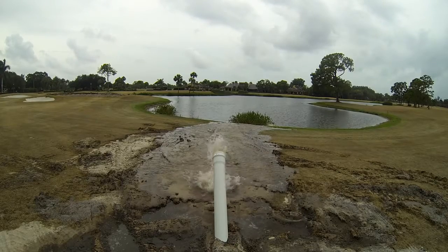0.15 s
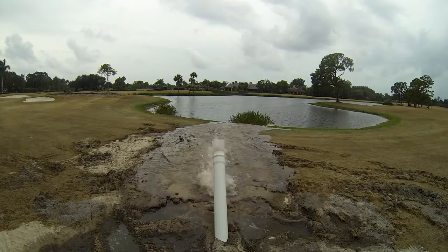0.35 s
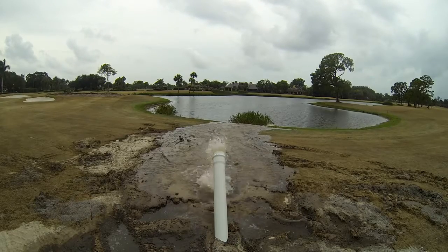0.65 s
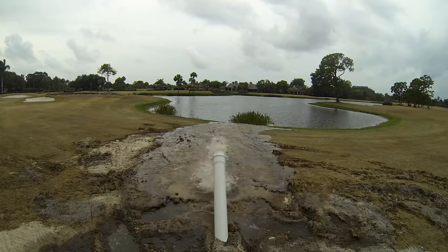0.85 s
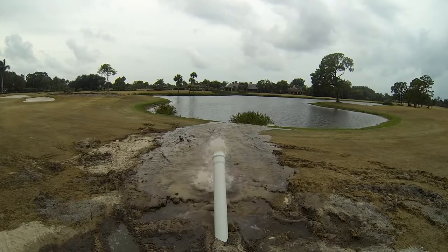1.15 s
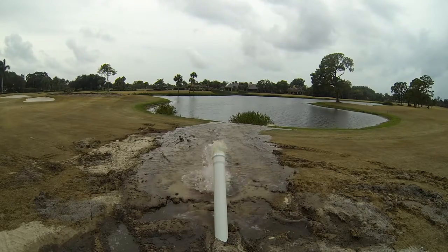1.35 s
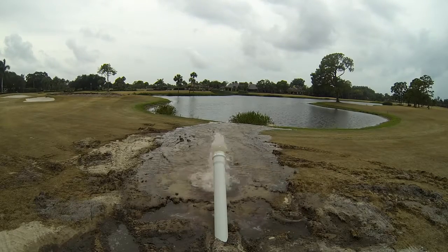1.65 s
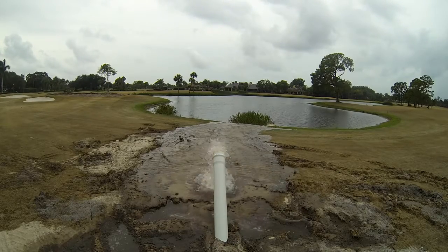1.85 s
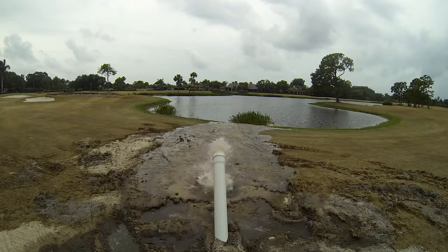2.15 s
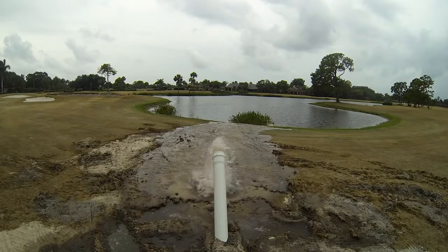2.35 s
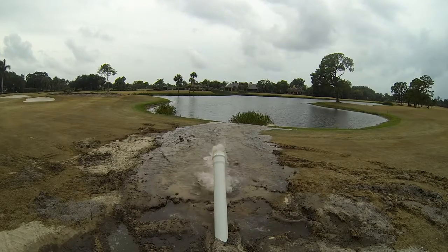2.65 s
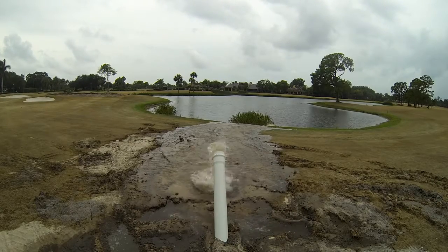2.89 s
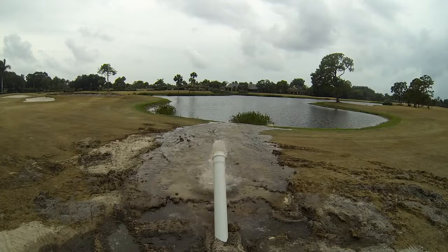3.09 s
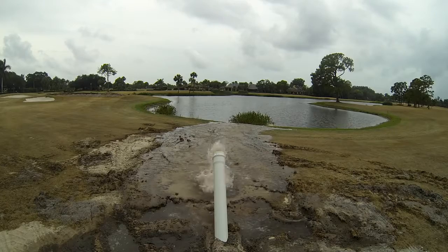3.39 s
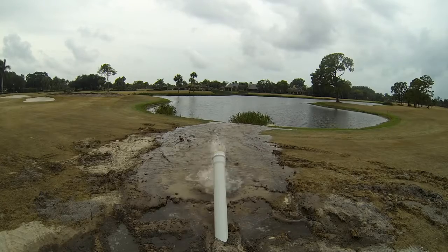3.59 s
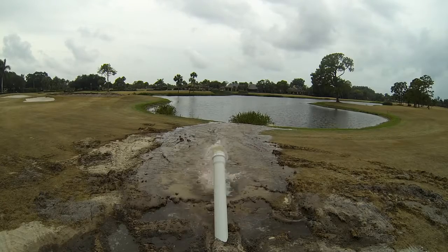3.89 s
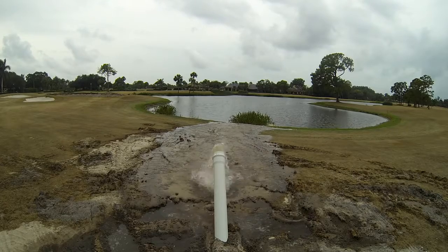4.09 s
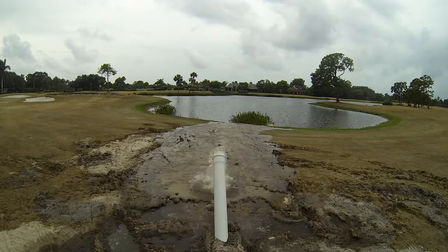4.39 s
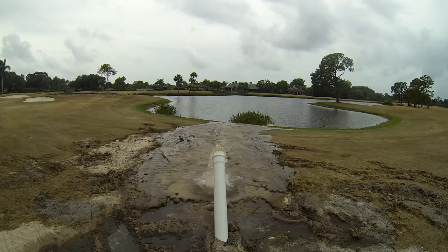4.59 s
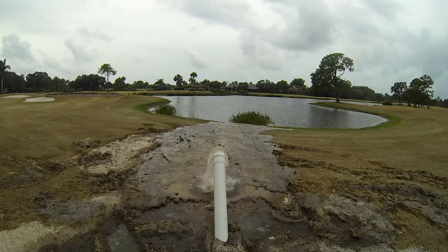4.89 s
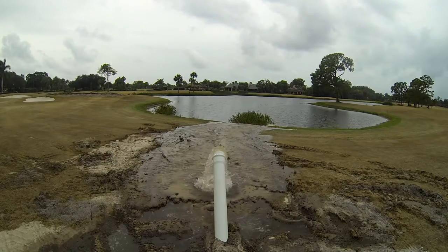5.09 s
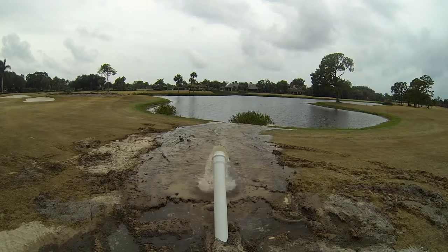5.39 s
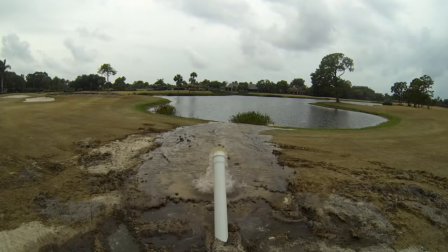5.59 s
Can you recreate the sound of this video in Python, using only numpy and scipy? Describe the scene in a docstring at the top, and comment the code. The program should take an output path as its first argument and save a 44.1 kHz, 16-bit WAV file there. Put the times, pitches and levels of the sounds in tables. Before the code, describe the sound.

Water is already gushing from an open pipe at 0 s, dropping in irregular slugs onto flooded ground, roughly five each second. Each has a bubbling low plunge, a dense mid-range splash and a thinner hiss of spray. A flat slap pops out near 0.7 s, with tiny high drips around it. Uneven pouring continues, with a stronger splash near 2.2 s. From about 2.5 to 3 s, hollow gulps of collapsing air appear; a crisp, prominent slap and bright drips follow at 3.2 s, then smaller slaps near 3.4 and 3.6 s. Deep gulps and slaps return around 4.0 and 4.3 s, with another gulp at 4.5 s. The stream thickens slightly towards a last slap near 5.4 s, then stops abruptly around 5.7 s. Underneath run soft runoff, a low pump hum, gentle wind thuds and a barely audible high electronic whine. Close, boxy camera microphone outdoors, without echo.

```python
"""First heard is a slug of water landing on flooded ground; more follow as water gushes from an open pipe.
Filtered bubbles and noise make each plunge, splash and spray; slaps, gulps and close drips stand out.
Behind them noise makes runoff and light wind on the microphone, and sines a pump humming through the pipe.
The camera's housing gives the water a hollow colour, held in the spectra; its electronics whine faintly."""
import sys
import numpy as np
from scipy.fft import rfft, irfft, next_fast_len
from scipy.io import wavfile
from scipy.ndimage import map_coordinates

SR = 44100
rng = np.random.default_rng(int(sys.argv[2]) if len(sys.argv) > 2 else 0)


def dump_mix(stems):
    """Bounce the given channels to the path in sys.argv[1] as a 16-bit WAV at rate SR."""
    frames = np.atleast_2d(stems).T  # one column per channel
    limited = np.clip(frames, -1, 1)  # hard clip at full scale
    pcm = np.round(limited * 32767).astype(np.int16)
    wavfile.write(sys.argv[1], SR, pcm)


N = 253134
TIME = np.arange(N) / SR  # s


def amp(db):
    """Decibels to gain."""
    return 10 ** (np.asarray(db) / 20)


def unit(x):
    """Scale to rms 1."""
    return x / np.sqrt(np.mean(x ** 2) + 1e-20)


def wobble(rate):
    """A smooth random curve through normal draws, rate knots a second."""
    knots = rng.standard_normal(int(N * rate / SR) + 4)
    return map_coordinates(knots, [TIME * rate])


def coloured(x, spectrum):
    """x through a causal minimum-phase filter with the given (f/Hz, level/dB) points."""
    size = 2 * next_fast_len(N // 2 + SR // 4)
    hz, db = np.transpose(spectrum)
    log_hz = np.log(np.fft.rfftfreq(size, 1 / SR) + 1)
    gain = amp(np.interp(log_hz, np.log(hz), db))
    # folding the cepstrum onto positive time makes the filter causal
    cepstrum = irfft(np.log(gain))
    cepstrum[1:size // 2] *= 2
    cepstrum[size // 2 + 1:] = 0
    response = np.exp(rfft(cepstrum))
    return irfft(rfft(x, size) * response)[:N]


def closed(spectrum):
    """The same spectrum, falling to -90 dB an octave beyond each end."""
    return [(spectrum[0][0] / 2, -90), *spectrum, (spectrum[-1][0] * 2, -90)]


def rush(spectrum):
    """Steady coloured noise of rms 1."""
    return unit(coloured(rng.standard_normal(N), closed(spectrum)))


def tones(lines):
    """Steady sines from (f/Hz, rms level/dB) rows."""
    sines = sum(amp(db) * np.sin(2 * np.pi * (hz * TIME + rng.random())) for hz, db in lines)
    return np.sqrt(2) * sines


# the camera's own thin electronic tones: [f/Hz, rms level/dB]
WHINE_TONES = [(10645, -78.3), (10693, -87.5), (10741, -93), (10789, -97), (10837, -95), (13187, -98)]


def electronics_whine():
    """The camera's electronics sing as a few steady high sines."""
    return tones(WHINE_TONES)


# steady electric tone: [f/Hz, rms level/dB]
MOTOR_TONES = [(300, -73)]


def motor():
    """A faint electric tone holds one steady pitch."""
    return tones(MOTOR_TONES)


# colour of the wind's thud: [f/Hz, relative level per Hz/dB]
THUD_SPECTRUM = [(8, -10), (15, -24.5), (23, -1), (29, -6), (35, 2.5), (41, -10.5), (50, -10.5),
                 (70, -18.5)]
# colour of the wind's rumble: [f/Hz, relative level per Hz/dB]
RUMBLE_SPECTRUM = [(36, -31), (48, -2.5), (56, 0), (66, 1), (74, -1), (79, 1), (84, 0), (94, -9.5),
                   (130, -6.5), (165, -12.5), (210, -31), (320, -29.5)]
# gusts on the housing: [peak t/s, length/s, thud rms level/dB, rumble rms level/dB]
WIND_GUSTS = [(0.18, 0.34, -44.5, -54), (0.773, 0.42, -48, -54.5), (1.32, 0.32, -42, -49.5),
              (1.897, 0.24, -43, -53.5), (2.296, 0.32, -45.5, -59), (2.828, 0.25, -41, -51.5),
              (3.17, 0.35, -49, -52), (4.0, 0.83, -50.5, -54), (4.6, 0.5, -45.5, -51),
              (5.14, 0.32, -45.5, -46.5)]
# the breeze between the gusts, rms level/dB
CALM_THUD_DB, CALM_RUMBLE_DB = -56.5, -52.5


def wind():
    """Light gusts add their power to a breeze; each thuds on the housing and rumbles."""
    s, length, thud_db, rumble_db = np.transpose(WIND_GUSTS)
    swells = np.exp(-(2 * (TIME[:, None] - s) / length) ** 2)
    thud = np.sqrt(amp(CALM_THUD_DB) ** 2 + swells @ amp(thud_db) ** 2)
    rumble = np.sqrt(amp(CALM_RUMBLE_DB) ** 2 + swells @ amp(rumble_db) ** 2)
    return thud * rush(THUD_SPECTRUM) + rumble * rush(RUMBLE_SPECTRUM)


# colour of the running water: [f/Hz, relative level per Hz/dB]
RUNOFF_SPECTRUM = [(110, -7), (170, 11), (240, 7), (300, 6), (420, -7.5), (600, -7.5), (800, -10.5),
                   (1200, -25)]


def runoff():
    """Water runs steadily through the pipe and away over the mud."""
    return amp(-65) * rush(RUNOFF_SPECTRUM)


# the pump's hum: [multiple of the shaft speed, rms level before a slight flutter/dB]
PUMP_HARMONICS = [(1, -58), (3, -67.5), (4, -53), (5, -67), (6, -70.5)]
SHAFT_HZ = 35.75  # mean turns a second


def pump():
    """The impeller's vanes beat four times a turn; the shaft speed wavers a little."""
    turns = np.cumsum(SHAFT_HZ * (1 + 0.0015 * wobble(3.66))) / SR
    hum = sum(amp(db) * np.sin(2 * np.pi * (k * turns + rng.random())) for k, db in PUMP_HARMONICS)
    return np.sqrt(2) * hum * amp(0.18 * wobble(9.6))


def single_bubbles(rows, t60, attack, rise):
    """Each bubble swells, rings and dies while its pitch creeps up; t60 and attack in seconds."""
    out = np.zeros(N)
    for s, db, hz in rows:
        age = np.clip(TIME - s, 0, 2 * t60)
        swell = amp(db - 60 * age / t60) * (1 - np.exp(-age / attack))
        out += swell * np.sin(2 * np.pi * hz * age * (1 + rise * age / t60))
    return out


# single drops close to the microphone: [t/s, level before attack and decay/dB, starting ring f/Hz]
DRIP_EVENTS = [(0.624, -57, 9500), (0.762, -58, 8000), (3.181, -49, 6420), (3.199, -55, 7850),
               (3.406, -54, 7700), (5.455, -56, 7000)]


def drips():
    """Single drops tick close by, each a short high ring."""
    return single_bubbles(DRIP_EVENTS, t60=0.017, attack=.0002, rise=0.11)


# big collapsing air pockets: [t/s, level before attack and decay/dB, starting ring f/Hz]
GULP_EVENTS = [(2.495, -45, 504), (2.672, -48, 1090), (2.84, -39, 980), (3.003, -42, 1024),
               (3.968, -42, 1380), (3.972, -37, 532), (4.32, -39.5, 515), (4.53, -46, 535)]


def gulps():
    """Big air pockets gulp as they collapse, ringing lower and longer than the drips."""
    return single_bubbles(GULP_EVENTS, t60=0.082, attack=0.0055, rise=0.046)


# lumps of water that slap the ground: [t/s, noise level before attack, decay and colouring/dB]
SLAP_EVENTS = [(0.683, -30), (3.178, -27), (3.405, -36), (3.643, -35), (3.974, -33), (4.314, -32.5),
               (5.375, -34)]


def slaps():
    """A lump of water lands flat: a noise crack of a few milliseconds in the colours of splash and spray."""
    bursts = np.zeros(N)
    for s, db in SLAP_EVENTS:
        age = np.maximum(TIME - s, 0)
        bursts += amp(db - 60 * age / 0.017) * (1 - np.exp(-age / 0.00055))
    noise = rng.standard_normal(N) * bursts
    splash = amp(5.0) * coloured(noise, closed(SPLASH_SPECTRUM))
    spray = amp(-14) * coloured(noise, closed(SPRAY_SPECTRUM))
    return splash + spray


def bubbles(lo_hz, hi_hz, cycles, spread_db, rise, count):
    """Bubbles born at random moments; each rings a few cycles and rises in pitch as it nears the surface."""
    when, pitch, life, strength = rng.random((count, 4)).T[:, :, None]
    hz = lo_hz + (hi_hz - lo_hz) * pitch
    decay = cycles * (.5 + life) / hz / np.pi  # s
    # the longest ring, capped to bound the array size
    length = min(int(4 * decay.max() * SR), 5_000_000 // count)
    t = np.arange(length) / SR
    # many weak bubbles, few strong ones
    gain = amp(-spread_db * np.log(np.maximum(strength, .02))) / np.sqrt(decay)
    phase = 2 * np.pi * hz * t * (1 + rise * np.minimum(t / decay, 4) / 8)
    sign = rng.choice([-1, 1], (count, 1))
    rings = gain * np.exp(-t / decay) * np.sin(phase) * sign
    index = (when * N).astype(int) + np.arange(len(t))
    return unit(np.bincount(index.ravel(), rings.ravel(), N)[:N])


def churn(grains, spectrum, froth_db, flutter_db, flutter_rate):
    """Distinct bubbles over a froth of countless small ones, fluttering as the jet tears up; rms 1."""
    water = grains + amp(froth_db) * rng.standard_normal(N)
    fluttering = water * amp(flutter_db * wobble(flutter_rate))
    return unit(coloured(fluttering, closed(spectrum)))


def softened(db, share):
    """A level curve with its swing about the mean scaled by share."""
    return db.mean() + share * (db - db.mean())


SLUG_ATTACK_S, SLUG_T60_S = 0.052, 0.35


def slug(s, hold):
    """A slug builds up until it lands in full, pours for a moment and drains away."""
    age = TIME - s
    build = np.clip(1 + age / SLUG_ATTACK_S, 0, 1)
    drain = amp(-60 * np.maximum(age - hold, 0) / SLUG_T60_S)
    return build * drain


# the unbroken stream between the slugs, fuller towards the end: [t/s, splash level/dB]
STREAM_LEVELS = [(0, -55.5), (3.9, -56.5), (4.8, -54), (5.74, -52.5)]
# slugs that land on the ground:
# [landing t/s, hold/s, splash level/dB, plunge level re splash/dB, spray level re splash/dB]
SLUG_EVENTS = [(0.01, 0.11, -56.5, -1, -13.5), (0.233, 0.007, -54.5, -4.0, -13.5),
               (0.393, 0.22, -56.0, -8, -13), (0.656, 0.044, -51, -7.5, -14.5),
               (0.904, 0.058, -54.0, -13, -10.5), (1.005, 0.033, -51.5, -5, -15),
               (1.18, 0.11, -54.5, -10, -12), (1.397, 0.123, -55.5, -7, -10.5),
               (1.624, 0.045, -53.5, -5.0, -15), (1.846, 0.048, -52.5, -7.0, -14.5),
               (2.094, 0.068, -54, -7, -12.5), (2.22, 0.012, -50, -7.5, -16.5),
               (2.437, 0.078, -54.5, -13, -11.5), (2.598, 0.076, -57.5, -8.0, -12.5),
               (2.676, 0.009, -52.5, -14, -14.0), (2.834, 0.017, -49.5, -7.5, -14.5),
               (3.003, 0.007, -50, -4, -17.5), (3.212, 0.012, -49.5, -7, -14),
               (3.264, 0.037, -55.5, -5, -13.5), (3.402, 0.007, -51.0, -5.5, -16),
               (3.568, 0.076, -56.5, -8.0, -12), (3.662, 0.096, -52.0, -5.5, -16),
               (3.968, 0.025, -51, -3, -14), (4.12, 0.086, -55, -12.5, -13),
               (4.27, 0.055, -54.5, -4.5, -17.0), (4.38, 0.007, -57.5, -2.0, -17),
               (4.53, 0.019, -54.5, 0, -15.5), (4.658, 0.093, -55.5, -8.5, -13),
               (4.841, 0.158, -57, -5.5, -18), (5.101, 0.043, -55, -2.5, -12.5),
               (5.329, 0.098, -54, -4, -18), (5.578, 0.035, -55.0, -6.0, -15)]
# the stream's mean plunge level, and its spray level, against its splash/dB
PLUNGE_DB, SPRAY_DB = -5, -13.5
# a fuller stream digs deeper: dB of plunge for each dB of splash
PLUNGE_GROWS = 1.45
# chance swell and sink of the whole flow: depth/dB, knots a second
SLOSH_DB, SLOSH_RATE = 0.5, 30


def flow():
    """Plunge, splash and spray levels in dB: slugs add their power to the stream's, and all of it sloshes."""
    stream_s, stream_splash_db = np.transpose(STREAM_LEVELS)
    stream_db = np.interp(TIME, stream_s, stream_splash_db)
    stream_plunge_db = softened(stream_db, PLUNGE_GROWS) + PLUNGE_DB
    power = amp([stream_plunge_db, stream_db, stream_db + SPRAY_DB]) ** 2
    for s, hold, db, plunge_db, spray_db in SLUG_EVENTS:
        peaks = amp([[db + plunge_db], [db], [db + spray_db]])
        power = power + (peaks * slug(s, hold)) ** 2
    return 10 * np.log10(power) + SLOSH_DB * wobble(SLOSH_RATE)


# colours of the water from deep to fine, each: [f/Hz, level per Hz/dB]
PLUNGE_SPECTRUM = [(110, -45.5), (190, 2.5), (250, 0.5), (340, 0.5), (450, 0.5), (560, 1), (700, -2.5),
                   (820, -12.5), (1100, -24)]
SPLASH_SPECTRUM = [(500, -37), (760, -8.5), (930, -2), (1130, -2.5), (1250, -2.5), (1420, -0.5),
                   (1620, -3.5), (1800, -7), (2050, -8.5), (2420, -14), (2700, -7.5), (2920, -4.5),
                   (3170, -7.5), (3400, -22.5), (4000, -66)]  # also colours the slaps
SPRAY_SPECTRUM = [(2900, -30), (3500, 0.5), (3780, -3.5), (4050, -1), (4400, 2.5), (4800, -4), (5050, -4.5),
                  (5600, -8.5), (6200, -8.5), (6600, -0.5), (7000, -0.5), (7500, -7), (8200, -3.5),
                  (8700, -10.5), (9400, -37), (10500, -54)]  # also colours the slaps
MIST_SPECTRUM = [(7800, -22), (9000, 4.5), (9500, 0), (9900, 2.5), (10350, 1.5), (11000, 0.5),
                 (12000, -3.5), (13200, -0.5), (14200, -5.5), (15200, -10)]
# mist follows the spray: its level against it/dB and its share of the swing
MIST_DB, MIST_SHARE = -10.5, 0.74


def jet():
    """Each slug drives big air pockets under, bursts into small bubbles and scatters fine drops."""
    plunge_db, splash_db, spray_db = flow()
    # the finest mist hangs on between the slugs, so it swells less than the spray
    mist_db = softened(spray_db, MIST_SHARE) + MIST_DB
    pockets = bubbles(203.4, 834, cycles=6.4, spread_db=2.0, rise=0.076, count=3600)
    small = bubbles(760, 3503, cycles=11.8, spread_db=1.5, rise=0.044, count=14000)
    drops = bubbles(3320, 15350, cycles=12, spread_db=1, rise=0.096, count=16000)
    plunge = churn(pockets, PLUNGE_SPECTRUM, froth_db=1.5, flutter_db=.6, flutter_rate=110)
    splash = churn(small, SPLASH_SPECTRUM, froth_db=3.5, flutter_db=.4, flutter_rate=300)
    spray = churn(drops, SPRAY_SPECTRUM, froth_db=3, flutter_db=.4, flutter_rate=150)
    mist = churn(drops, MIST_SPECTRUM, froth_db=8, flutter_db=.2, flutter_rate=150)
    water = amp(plunge_db) * plunge + amp(splash_db) * splash
    water = water + amp(spray_db) * spray + amp(mist_db) * mist
    # the whole jet trembles as it breaks up
    return water * amp(.4 * wobble(150))


def scene():
    """Wind, pump and water at one microphone."""
    background = wind() + motor() + runoff() + pump()
    water = drips() + gulps() + slaps() + jet()
    return (background + water)[None]


TOP_HZ = 15150  # the camera's band limit


def record(dry):
    """The camera adds its thin whine and keeps nothing above its band limit."""
    size = next_fast_len(N + SR // 2)
    keep = np.fft.rfftfreq(size, 1 / SR) < TOP_HZ
    spectrum = rfft(dry + electronics_whine(), size)
    return irfft(spectrum * keep, size)[:, :N]


dry = scene()
out = record(dry)
dump_mix(out)
```